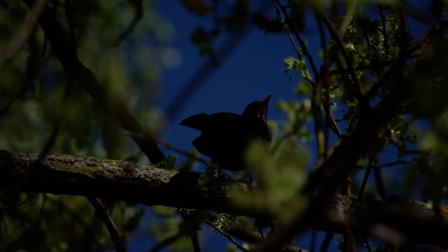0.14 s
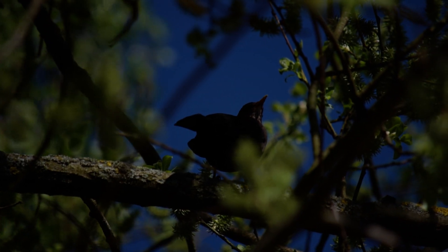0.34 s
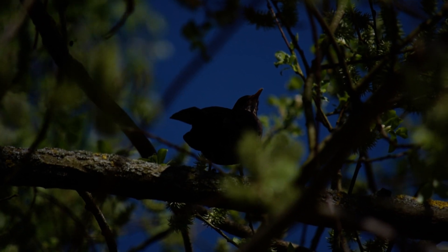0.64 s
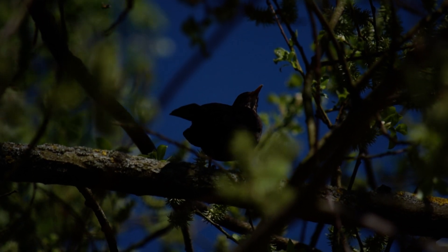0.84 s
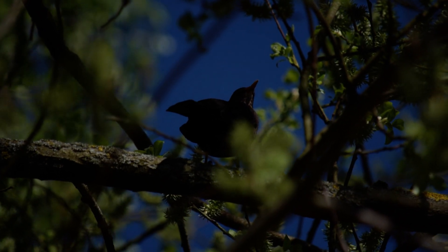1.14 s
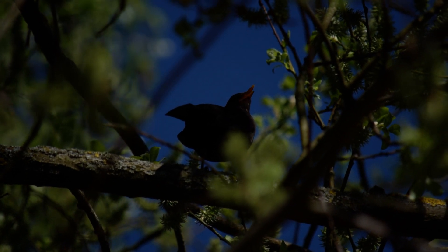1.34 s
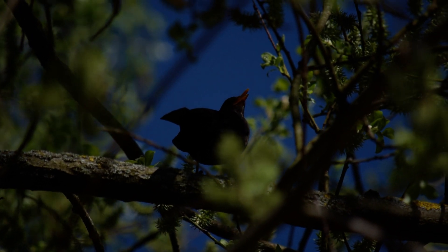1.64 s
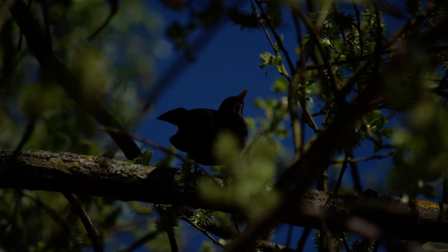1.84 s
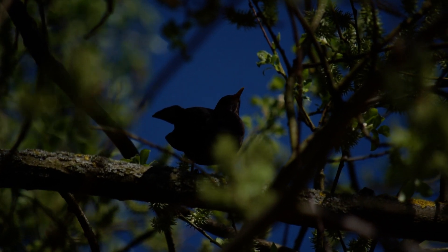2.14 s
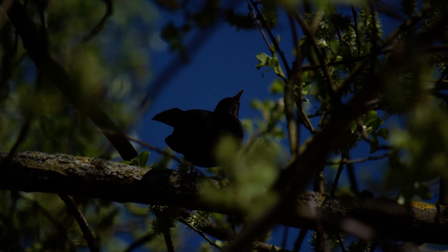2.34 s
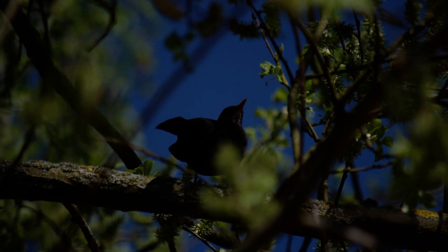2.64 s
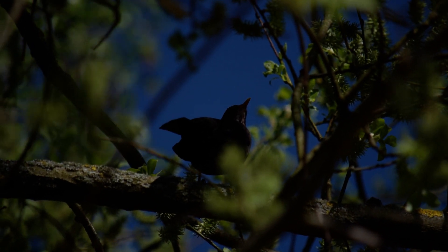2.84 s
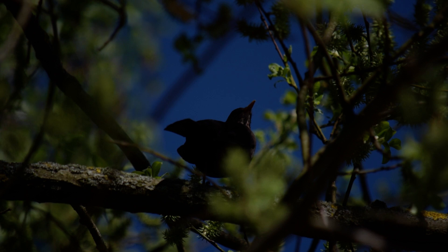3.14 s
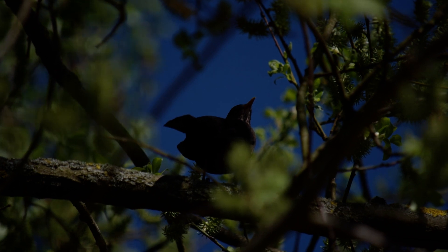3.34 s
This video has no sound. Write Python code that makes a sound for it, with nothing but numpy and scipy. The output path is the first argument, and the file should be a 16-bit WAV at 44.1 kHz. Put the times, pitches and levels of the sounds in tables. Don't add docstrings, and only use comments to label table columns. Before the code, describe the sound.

A blackbird's pure alarm whistle falls in pitch once, early in the scene, through loud low wind buffeting on an unprotected camera microphone; far songbirds chirp and twitter faintly, and a small twig snap comes near the end.

```python
import sys
import numpy as np
from scipy import signal
from scipy.io import wavfile
from scipy.ndimage import uniform_filter1d

SR = 44100
rng = np.random.default_rng(int(sys.argv[2]) if len(sys.argv) > 2 else 0)


def wav_record(signal):
    frames = np.transpose(np.atleast_2d(signal))
    bounded = np.clip(frames, -1, 1)
    quanta = np.round(bounded * 32767).astype(np.int16)
    wavfile.write(sys.argv[1], SR, quanta)


def ratio_of_db(decibels):
    return 10 ** (np.asarray(decibels, float) / 20)


N = 153909

# time in seconds, pitch in Hz, level in dB.
WHISTLE = [
    (1.273, 9600, -61),
    (1.307, 9210, -53),
    (1.346, 9150, -46.5),
    (1.369, 9066, -36.5),
    (1.499, 8680, -31.5),
    (1.616, 8310, -40),
    (1.648, 8320, -42),
    (1.785, 7990, -48),
    (1.824, 7900, -68),
]
# time in seconds, change in dB.
WHISTLE_FADES = [
    (1.388, -5),
    (1.442, -9.5),
    (1.526, -2),
    (1.605, -4),
    (1.68, -5.5),
    (1.76, 0),
]
# start in seconds, end in seconds, left level in dB, right level in dB.
GUSTS = [(0, 0.1, -30.5, -28), (0.093, 0.158, -38, -28.5), (0.172, 0.411, -31.5, -29.5),
         (0.48, 0.477, -52, -39), (0.654, 0.94, -44.5, -39), (1.007, 1.105, -47.5, -36.5),
         (1.168, 1.359, -33, -28.5), (1.319, 1.566, -35.5, -28.5), (1.631, 1.653, -38, -37),
         (1.804, 1.864, -31.5, -37.5), (1.973, 2.046, -30.5, -28.5), (2.097, 2.147, -47, -25),
         (2.289, 2.406, -44.5, -33.5), (2.502, 2.617, -34.5, -31), (2.624, 2.741, -32, -28),
         (2.769, 2.815, -33.5, -20.5), (2.9, 3.13, -37, -28.5), (3.194, 3.325, -41.5, -33)]
# frequency in Hz, level in dB per Hz.
RUMBLE_SPECTRUM = [(40, -22), (170, 4.5), (400, -6), (900, -38)]
# time in seconds, peak in dB, pitch in Hz.
BIG_EDDIES_LEFT = [(0.013, -18, 400), (0.277, -19, 256), (0.3, -24, 340), (1.205, -34, 201),
                   (1.374, -19, 235), (1.542, -17, 340), (1.869, -26, 216), (1.976, -22.5, 230),
                   (2.335, -25, 348), (2.701, -20, 280), (2.815, -13, 352), (2.968, -19.5, 197),
                   (3.01, -25, 252)]
# time in seconds, peak in dB, pitch in Hz.
BIG_EDDIES_RIGHT = [(0.0003, -22.5, 400), (0.005, -17, 347), (0.071, -23.5, 318), (0.137, -20, 246),
                    (0.286, -23, 233), (0.324, -17.5, 264), (0.392, -12.5, 416), (1.366, -17.5, 270.0),
                    (1.452, -16.5, 330), (1.539, -13.5, 260), (1.993, -16.5, 580), (2.101, -20, 232),
                    (2.147, -20, 272), (2.326, -12.5, 450), (2.654, -17.5, 338), (2.692, -18.5, 360),
                    (2.773, -23.5, 278), (2.783, -22, 206)]
KNOCK_TIMES = [.469, .502, 0.638, 0.743, 0.816, 0.888, .976, 1.242, 1.352, 1.7, 2.075, 2.611, 2.649, 3.127]
# time in seconds, peak in dB, pitch in Hz.
MID_EDDIES_LEFT = [(0.024, -13.5, 394), (0.033, -20.5, 348), (0.049, -20, 428), (0.061, -33, 258),
                   (0.087, -19.5, 493), (0.19, -24.5, 231), (0.225, -21.6, 430), (0.447, -24.5, 212),
                   (1.22, -18, 303), (1.403, -24, 297), (1.432, -22, 295), (1.624, -29.5, 259),
                   (1.999, -15.5, 299), (2.008, -16.5, 204), (2.344, -20, 227), (2.516, -32, 322),
                   (2.553, -16.5, 296), (2.565, -27, 330), (2.639, -33, 249), (2.651, -18, 346),
                   (2.689, -21, 209), (2.713, -19, 310)]
# time in seconds, peak in dB, pitch in Hz.
MID_EDDIES_RIGHT = [(0.087, -21, 311), (0.101, -26, 362), (0.199, -18, 265), (0.298, -17.3, 287),
                    (0.338, -19, 258), (0.352, -21, 290), (0.463, -17.6, 285), (1.261, -15.5, 434),
                    (1.322, -17.5, 223), (1.394, -19, 370), (1.434, -14.5, 272), (1.485, -19, 297),
                    (1.528, -20, 273), (1.615, -15.5, 228), (2.005, -15, 498), (2.034, -22, 374),
                    (2.137, -16, 294), (2.348, -17, 340), (2.36, -18, 444), (2.513, -16, 300),
                    (2.527, -16.5, 363), (2.798, -22, 312), (2.811, -16.8, 340), (2.98, -17.5, 273),
                    (3.106, -22, 200), (3.283, -16.5, 220)]
# start in seconds, length in seconds, from Hz,
# to Hz, level in dB.
CHIRPS = [(.03, .075, 3200, 3750, -66), (.128, .025, 2900, 3300, -57), (.155, .03, 3250, 2900, -59),
          (.17, .02, 4100, 4900, -67), (.222, .045, 3700, 3900, -60), (.305, .03, 2900, 3750, -58),
          (.332, .025, 3650, 2600, -60), (.515, .025, 2900, 3500, -65), (.595, .02, 3600, 4400, -60),
          (.648, .02, 2900, 3600, -60), (.785, .035, 3800, 5000, -68), (.915, .045, 3000, 5000, -64),
          (1.09, .04, 3100, 4700, -67), (1.225, .04, 3100, 4600, -64), (2.22, .05, 4900, 4450, -65),
          (2.255, .1, 3750, 3550, -61), (2.35, .032, 3650, 3250, -57), (2.618, .017, 5750, 6350, -59),
          (2.8, .045, 3500, 4600, -66), (2.965, .045, 3600, 4700, -65), (3.11, .05, 3500, 4600, -65),
          (3.275, .05, 3500, 4700, -65),
          (3.402, .035, 5100, 4600, -65),
    (3.447, .016, 3800, 3750, -59),
    (3.477, .013, 4100, 4650, -61),
    (2.285, .05, 4300, 4500, -65),
    (1.3, .09, 3500, 4300, -64),
          (2.505, .045, 3400, 4600, -67), (.19, .022, 5050, 4700, -65), (.255, .03, 4500, 4750, -65),
               (.27, .05, 4300, 3600, -67), (2.215, .03, 3700, 3900, -65), (2.368, .028, 3500, 2600, -59),
               (2.53, .025, 7800, 7900, -70), (2.63, .028, 6300, 6350, -62), (2.715, .022, 7700, 7200, -70),
               (2.89, .03, 2900, 4300, -64), (3.466, .014, 3700, 3850, -57)]
# start in seconds, level in dB.
TRILLS = [
    (2.784, -64),
    (2.857, -66),
    (2.91, -68),
    (2.965, -65),
]
# time in seconds, pitch in Hz, level in dB.
TWIG_SNAPS = [
    (.068, 2280, -43.5),
    (3.466, 1850, -39),
]
# frequency in Hz, level in dB per Hz.
HUM_SPECTRUM = [(180, -19), (300, 1), (438, -26.5), (540, -9), (775, -3.5), (1070, 0), (2000, -13.5),
                (2600, -28), (3380, -60), (5720, -120)]
# time in seconds, change of hum in dB.
HUM_SWELL = [
    (0, -0.03),
    (2.1, 1.9),
    (2.5, -0.1),
    (3.49, -0.4),
]
# frequency in Hz, level in dB per Hz.
AIR_SPECTRUM = [(2200, -3), (2500, -4.5), (5100, -7), (5600, -11.5), (9200, -17.5), (12000, -21.5),
                (15000, -27)]
# centre in Hz, width in Hz, level in dB.
CHORUS = [(2955, 440, -68.5), (3584, 250, -71.5), (5105, 202, -75.5)]
# frequency in Hz, likeness from 0 to 1.
LIKENESS = [(300, 1), (960, 1), (1700, 0.9), (2900, 0.32), (5000, 0.28), (9000, 0.17)]


def evened(x):
    return x / np.sqrt(np.mean(x ** 2) + 1e-20)


def drift(shape, size):
    smooth = uniform_filter1d(rng.standard_normal(shape), size=size)
    return uniform_filter1d(smooth, size=size)


def read(points, hz):
    f, value = np.transpose(points)
    return np.interp(np.log(hz + 1), np.log(f + 1), value, left=value[0], right=value[-1])


def add(mix, s, sound):
    at = round(s * SR)
    part = mix[..., max(at, 0):][..., :sound.shape[-1] - max(-at, 0)]
    part += sound[..., max(-at, 0):][..., :part.shape[-1]]


def noise(gain, same, patchy_db):
    frames, hz = N // 256 + 5, np.fft.rfftfreq(1024, 1 / SR)
    a, b, c, d, patches = rng.standard_normal((frames, 513, 5)).T
    patches = uniform_filter1d(patches, size=10, axis=0)
    patches = evened(uniform_filter1d(patches, size=14, axis=1))
    same = np.clip(same(hz), -1, 1)[:, None]
    left = a + 1j * b
    right = same * left + np.sqrt(1 - same ** 2) * (c + 1j * d)
    z = np.array([left, right]) * gain(hz)[:, None] * ratio_of_db(patchy_db * patches)
    return evened(signal.istft(z, nperseg=1024, noverlap=768)[1][:, :N])


def echoes(x, t60):
    t = np.arange(SR // 2) / SR
    taps = rng.standard_normal((2, len(t))) * (rng.random((2, len(t))) < 0.05)
    taps *= ratio_of_db(-60 * t / t60) * np.minimum(t / 0.0007, 1)
    return signal.fftconvolve(np.atleast_2d(x), taps / np.linalg.norm(taps[0]), axes=1)[:, :N]


def whistle():
    fade_s, flutter_db, tail_s = 0.0062, 1.44, 0.014
    leaves_db, leaves_t60 = -13, 0.27
    t = np.arange(N) / SR
    s, hz, db = np.transpose(WHISTLE)
    level_db = np.interp(t, s, db) + flutter_db * evened(drift(N, 150))
    for at, depth_db in WHISTLE_FADES:
        level_db += depth_db * np.exp(-0.5 * ((t - at) / fade_s) ** 2)
    gate = np.clip((t - s[0]) / 0.003, 0, 1) * np.exp(-np.maximum(t - s[-1], 0) / tail_s)
    phase = 2 * np.pi * np.cumsum(np.interp(t, s, hz)) / SR
    tone = np.sqrt(2) * gate * ratio_of_db(level_db) * np.sin(phase)
    direct = tone * ratio_of_db(np.array([[-0.75], [0.75]]))
    return direct + ratio_of_db(leaves_db) * echoes(tone, leaves_t60)


def eddy(hz, phase):
    u = np.arange(-600, 600) / SR * hz
    after_swing = ratio_of_db(-16) * np.exp(-0.5 * ((u - 0.5) / 0.55) ** 2)
    shape = np.exp(-0.5 * (u / 0.24) ** 2) + after_swing
    swing = shape * np.sin(2 * np.pi * u + phase)
    return swing - shape * swing.sum() / shape.sum()


def small_eddies(above_lull_db):
    per_s, spread_db, brighten = 130, 4.5, 0.083
    out = np.zeros((2, N))
    size = ratio_of_db(spread_db * np.minimum(rng.exponential(1, (2, N)), 2.5))
    size *= rng.random((2, N)) < per_s / SR
    kind = rng.integers(0, 12, (2, N))
    for k, hz in enumerate(np.geomspace(131, 444, num=12)):
        hits = size * (kind == k) * ratio_of_db(brighten * k / 11 * above_lull_db)
        swing = eddy(hz, 2 * np.pi * rng.random())
        out += signal.oaconvolve(hits, swing[None], "same", axes=1)
    return evened(out)


def standout_eddies():
    big_db, mid_db = 7, 2
    out = np.zeros((2, N))
    knocks = [(s, -21 - big_db, 400) for s in KNOCK_TIMES]
    for port, table in enumerate((BIG_EDDIES_LEFT, BIG_EDDIES_RIGHT + knocks)):
        for (at, peak_db, hz), turn in zip(table, rng.uniform(-0.9, 1, (40, 2))):
            phase = turn[0] + np.pi * (turn[1] > 0)
            add(out[port], at - 600 / SR, ratio_of_db(peak_db + big_db) * eddy(hz, phase))
    for port, table in enumerate((MID_EDDIES_LEFT, MID_EDDIES_RIGHT)):
        for (at, peak_db, hz), turn in zip(table, rng.random(30)):
            add(out[port], at - 600 / SR, ratio_of_db(peak_db + mid_db) * eddy(hz, 2 * np.pi * turn))
    return out


def wind():
    lull_db, gust_edge_s, flicker_db = -41.5, 0.0067, 3.5
    eddy_db, rumble_db = -3.5, -2.5
    bass_hz, bass_db, bass_follow = 130, -34, 0.29
    t = np.arange(N) / SR
    level_db = np.full((2, N), float(lull_db))
    for start, end, left_db, right_db in GUSTS:
        level_db[:, (t >= start) & (t < end)] = [[left_db], [right_db]]
    level_db = uniform_filter1d(level_db, size=round(gust_edge_s * SR), axis=1)
    above_lull_db = level_db - lull_db
    eddies = small_eddies(above_lull_db)
    rumble = noise(lambda f: ratio_of_db(read(RUMBLE_SPECTRUM, f)) * (f < 1000), np.zeros_like, patchy_db=3.0)
    lumps = evened(drift((2, N), 700))
    steady = ratio_of_db(eddy_db) * eddies + ratio_of_db(rumble_db) * rumble
    bass = signal.sosfiltfilt(signal.butter(2, bass_hz, fs=SR, output="sos"), steady)
    out = (steady - bass) * ratio_of_db(level_db + flicker_db * lumps)
    out += bass * ratio_of_db(bass_db + bass_follow * above_lull_db)
    out += standout_eddies()
    low_cut = signal.butter(2, 75, "high", fs=SR, output="sos")
    return signal.sosfilt(low_cut, out)


def chirp(length, from_hz, to_hz, db):
    warble_hz, far_db = 160, -1.5
    u = np.arange(0, length, 1 / SR) / length
    waver = np.sin(2 * np.pi * (65 * u * length + rng.random()))
    waver *= min(length / 0.06, 1) ** 2
    hz = to_hz + (from_hz - to_hz) * (1 - u) ** 1.4 + warble_hz * waver
    swell = np.sin(np.pi * u) ** 0.7
    return ratio_of_db(db + 3 + far_db) * swell * np.sin(2 * np.pi * np.cumsum(hz) / SR)


def far_birds():
    breakup_db, woods_db, woods_t60 = 2.8, -1, 0.33
    tick_gap_s, tick_s, tick_from_hz, tick_to_hz = 0.012, 0.007, 7300, 5700
    twitter_from_s, twitter_to_s, twitter_ticks, twitter_db = 1.9, 3.0, 45, -74.5
    dry = np.zeros((2, N))
    for (s, *note), side_db in zip(CHIRPS, rng.uniform(-3.9, 1, 60)):
        add(dry, s, chirp(*note) * ratio_of_db(np.array([[side_db], [-side_db]])))
    grain = drift((2, N), 70)
    dry *= ratio_of_db(breakup_db * (evened(grain + grain[0]) - 0.08))
    for s, db in TRILLS:
        for k in range(3):
            add(dry, s + k * tick_gap_s, chirp(tick_s, tick_from_hz, tick_to_hz, db))
    for when, pitch, size in rng.random((twitter_ticks, 3)):
        from_hz = tick_from_hz * (0.9 + 0.2 * pitch)
        to_hz = tick_to_hz * (1 + 0.2 * pitch)
        tick = chirp(tick_s, from_hz, to_hz, twitter_db + 5 * size)
        add(dry, twitter_from_s + when * (twitter_to_s - twitter_from_s), tick)
    for s, hz, db in TWIG_SNAPS:
        add(dry, s - 0.003, chirp(0.003, hz * 1.25, hz * 0.8, db))
    return dry + ratio_of_db(woods_db) * echoes(dry, woods_t60)


def likeness(f):
    return read(LIKENESS, f)


def traffic_hum():
    hum = noise(lambda f: ratio_of_db(read(HUM_SPECTRUM, f)) * (f > 250) * (f < 2600), likeness, patchy_db=0.5)
    return hum * ratio_of_db(-47 + np.interp(np.arange(N) / SR, *np.transpose(HUM_SWELL)))


def leaf_hiss_and_chorus():
    air = noise(lambda f: ratio_of_db(read(AIR_SPECTRUM, f)) * (f > 2200) * (f < 15150), likeness, patchy_db=-1.1)
    air *= ratio_of_db(-63.5)
    for hz, width, db in CHORUS:
        band = noise(lambda f: np.exp(-0.5 * ((f - hz) / width * 2) ** 2), likeness, patchy_db=1.5)
        air += ratio_of_db(db) * band
    return air


def camera_whine():
    turns = 2 * np.pi * 15706 * np.arange(N) / SR
    left = ratio_of_db(-70) * np.sin(turns)
    right = ratio_of_db(-75.5) * np.sin(turns + 2.7)
    wander = evened(uniform_filter1d(rng.standard_normal((2, N)), size=4000))
    return np.sqrt(2) * np.array([left, right]) * ratio_of_db(1.5 * wander)


def hide_faint_treble(x):
    from_hz, on_db, range_db = 7800, -55, 36
    high_hz, high_extra_db, ragged_db = 10300, 6.5, 3
    hz, _, z = signal.stft(x, SR, nperseg=1024)
    treble = hz[:, None] > from_hz
    top = abs(z[:, hz > from_hz]).max(axis=(0, 1))
    blocks = np.kron(rng.standard_normal((z.shape[2] // 2 + 1, 33)), np.ones((2, 16)))
    blocks = blocks[:z.shape[2], :len(hz)].T
    threshold_db = on_db + (hz[:, None] > high_hz) * (high_extra_db + ragged_db * blocks)
    faint = abs(z) < np.maximum(top / ratio_of_db(range_db), ratio_of_db(-88))
    hidden = treble & (top > ratio_of_db(threshold_db)) & faint
    return signal.istft(z * ~hidden, SR, nperseg=1024)[1][:, :N]


def scene():
    return whistle() + wind() + traffic_hum() + leaf_hiss_and_chorus() + far_birds()


def band_limit(x):
    return signal.sosfilt(signal.butter(12, 15900, fs=SR, output="sos"), x)


def record(dry):
    mix = hide_faint_treble(dry) + camera_whine()
    return band_limit(mix)


dry = scene()
out = record(dry)
wav_record(out)
```